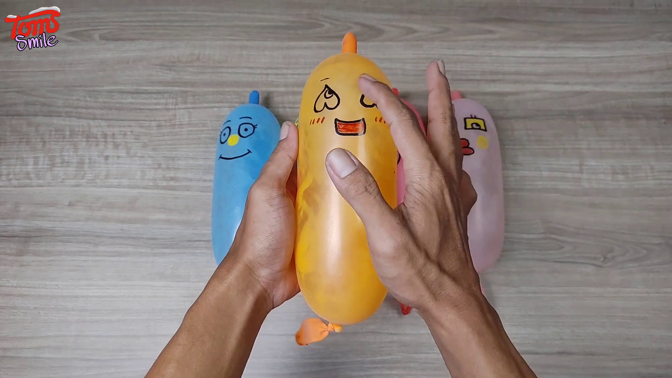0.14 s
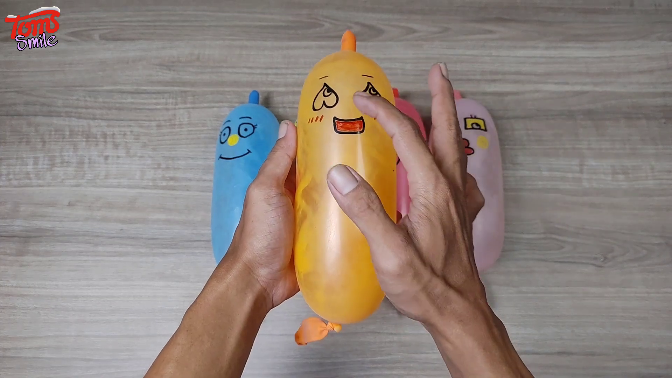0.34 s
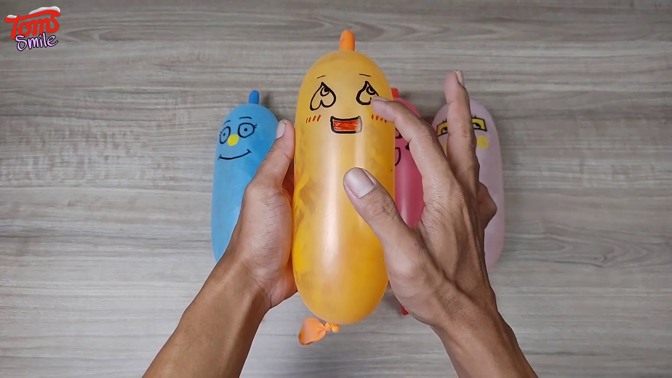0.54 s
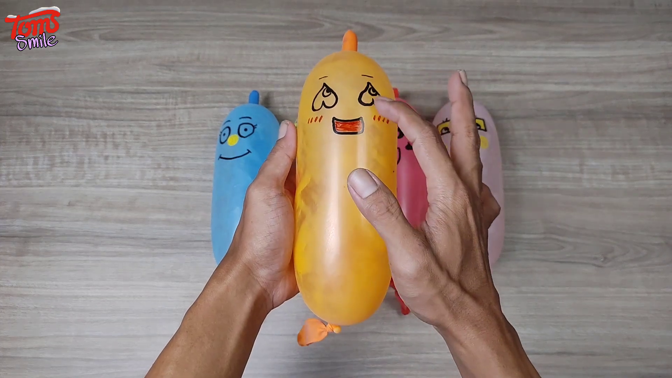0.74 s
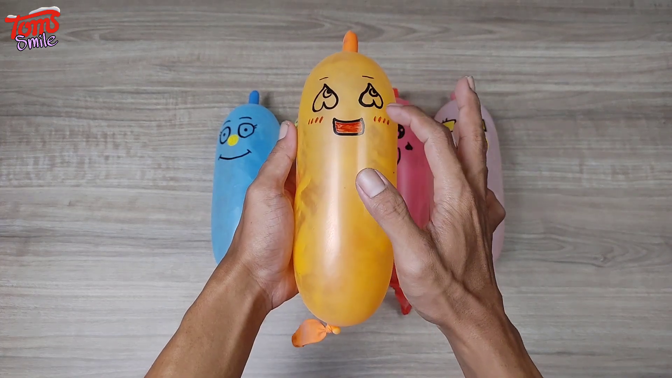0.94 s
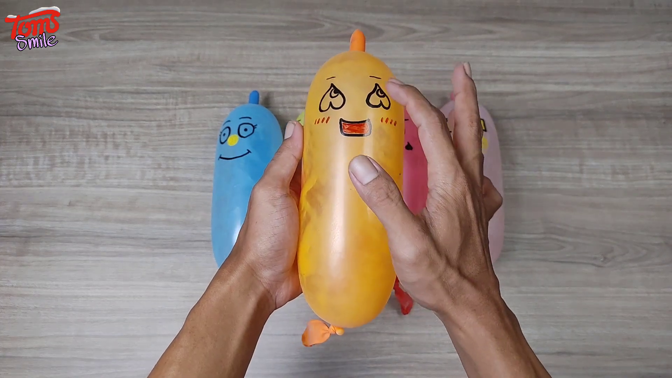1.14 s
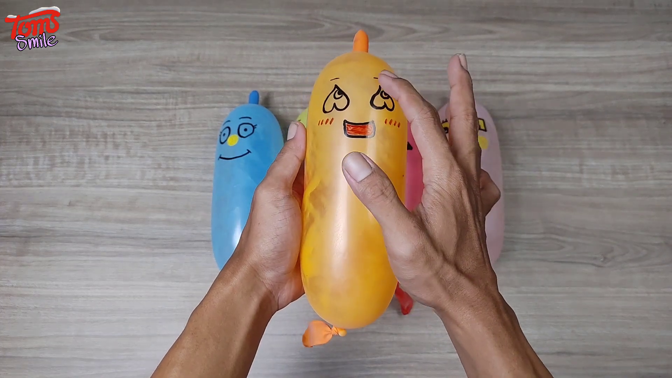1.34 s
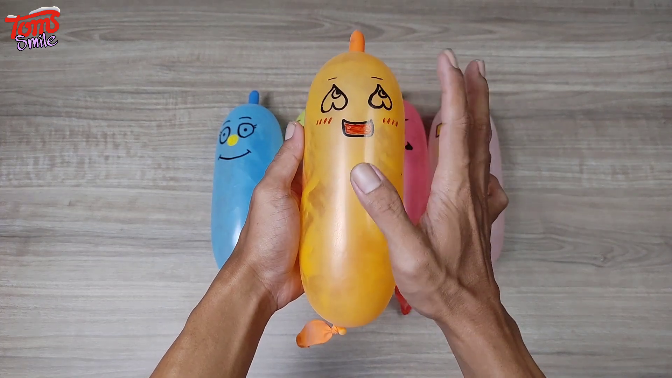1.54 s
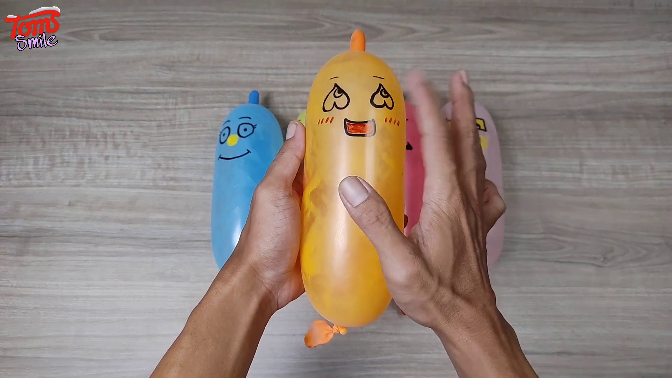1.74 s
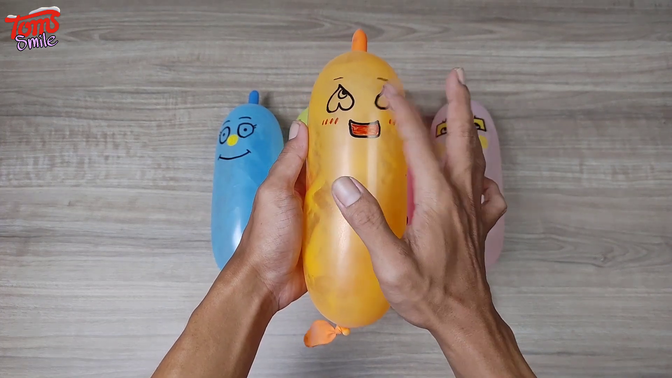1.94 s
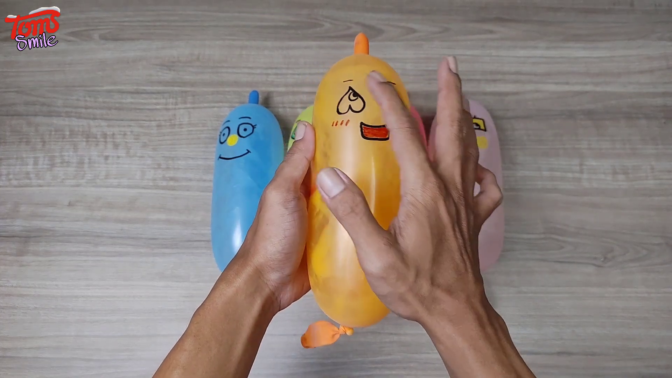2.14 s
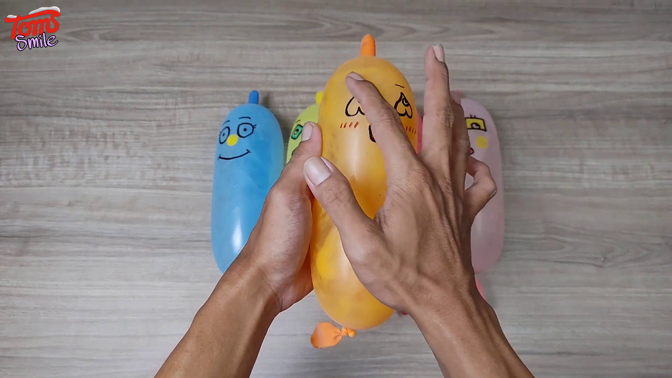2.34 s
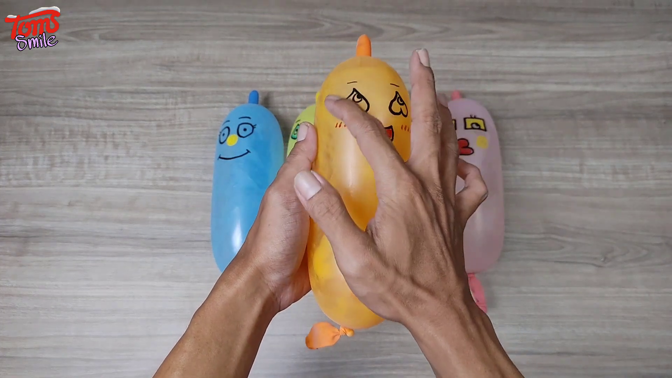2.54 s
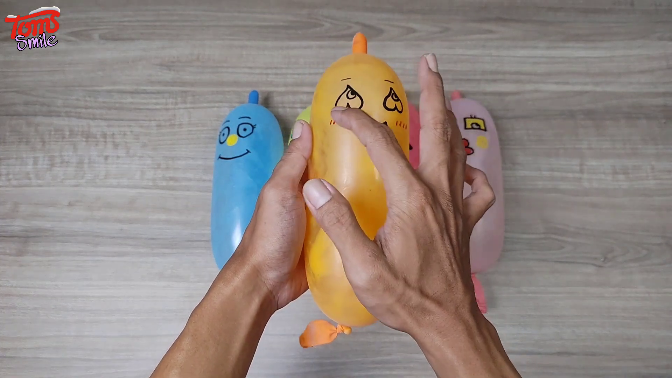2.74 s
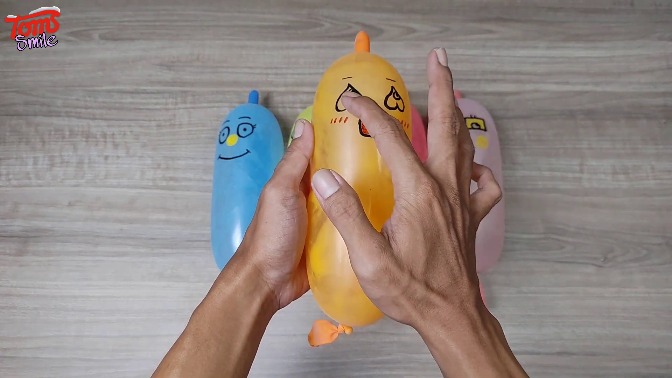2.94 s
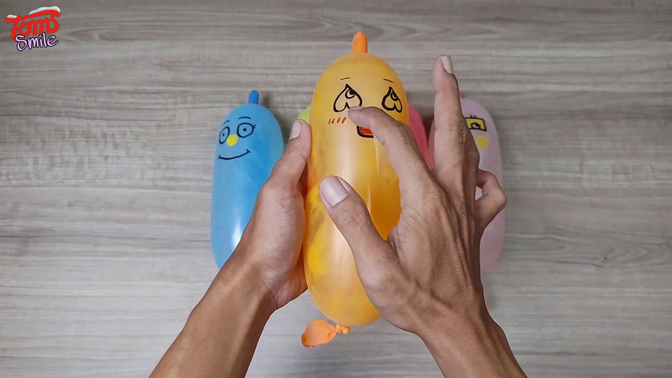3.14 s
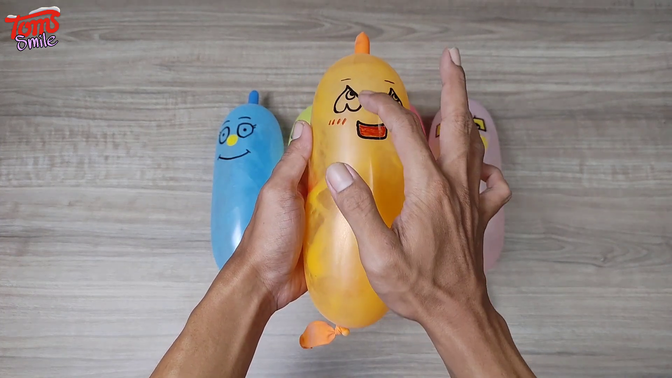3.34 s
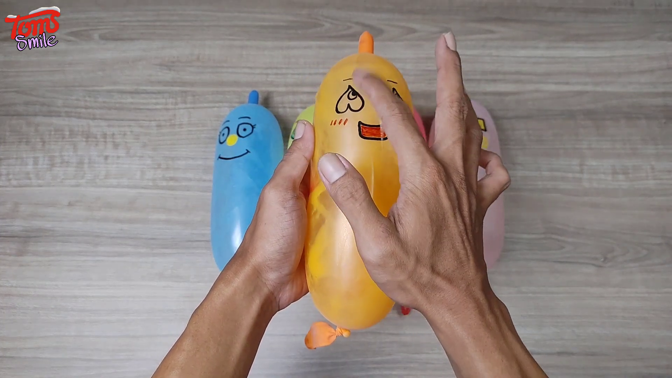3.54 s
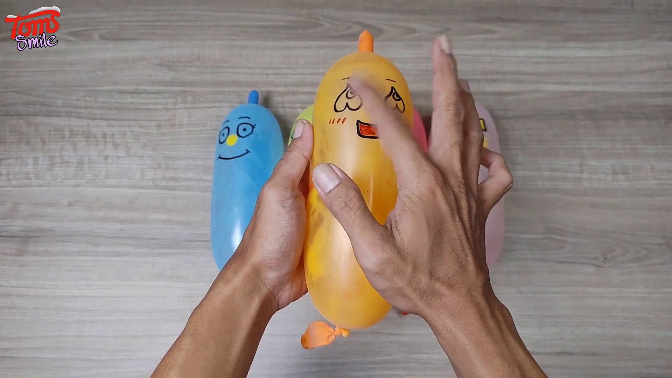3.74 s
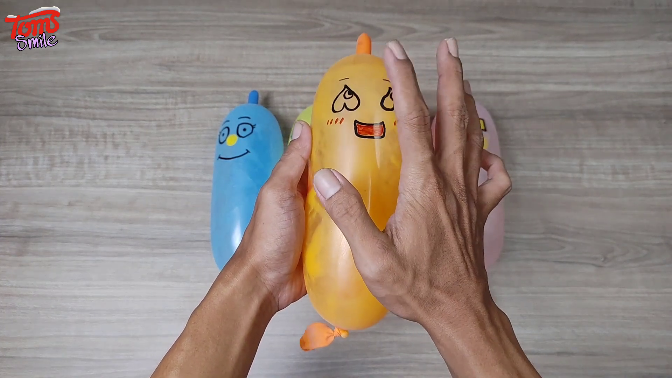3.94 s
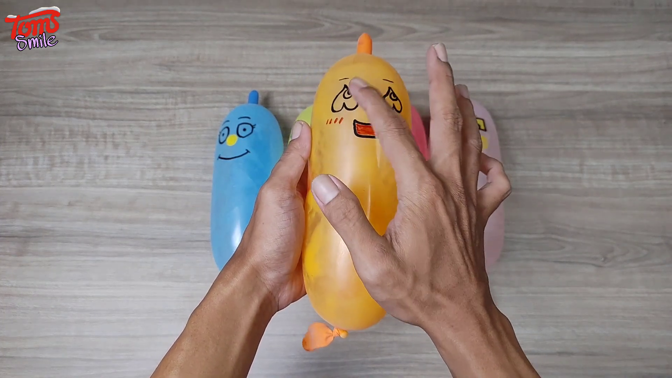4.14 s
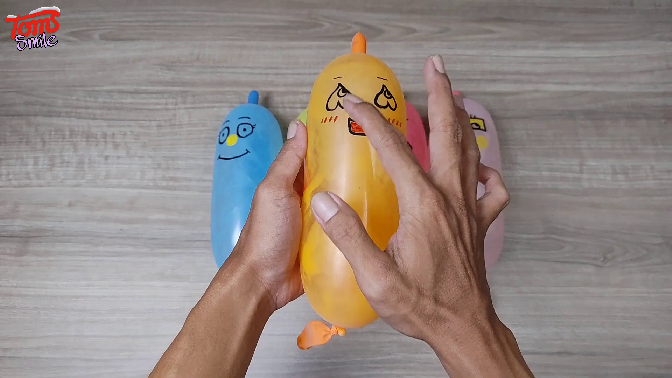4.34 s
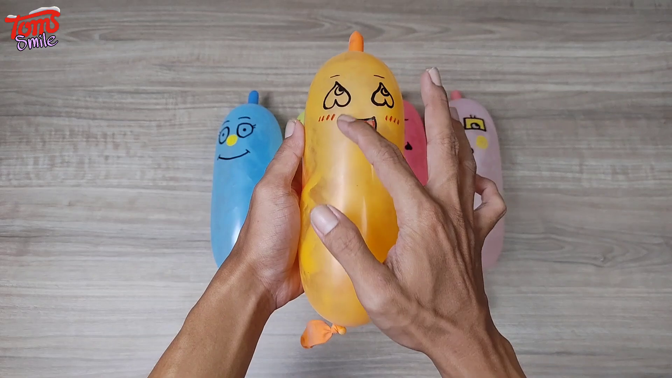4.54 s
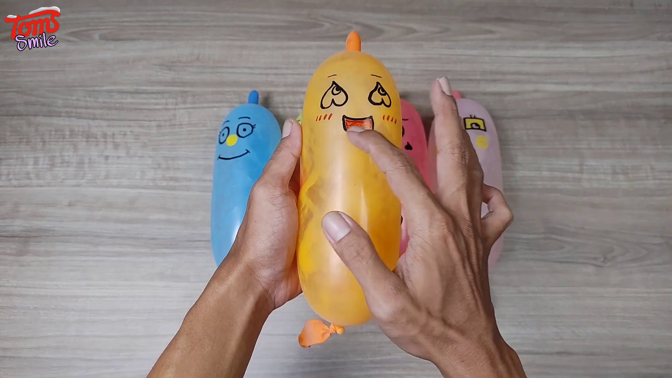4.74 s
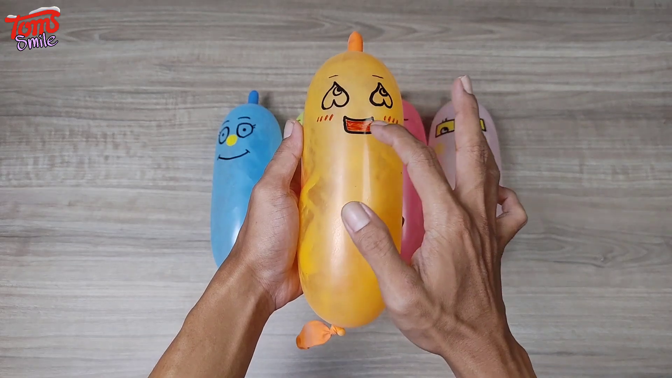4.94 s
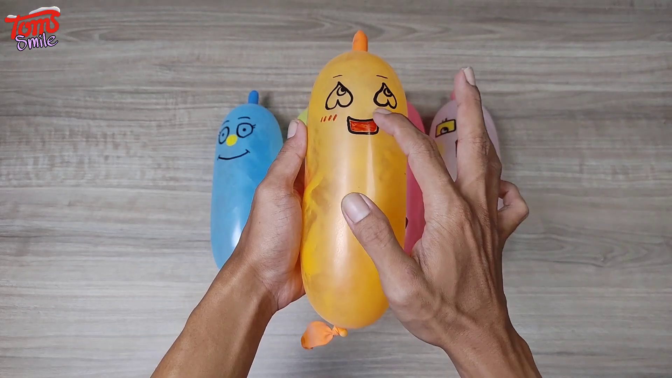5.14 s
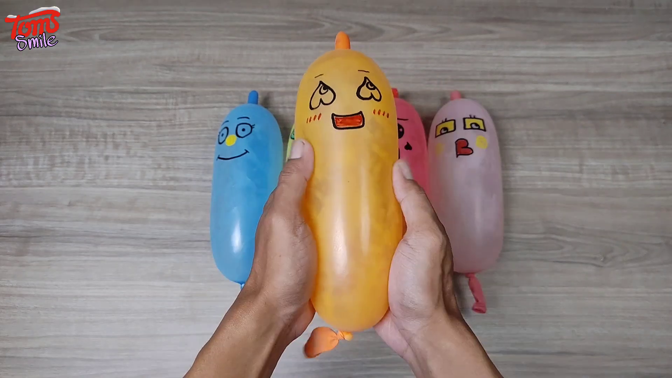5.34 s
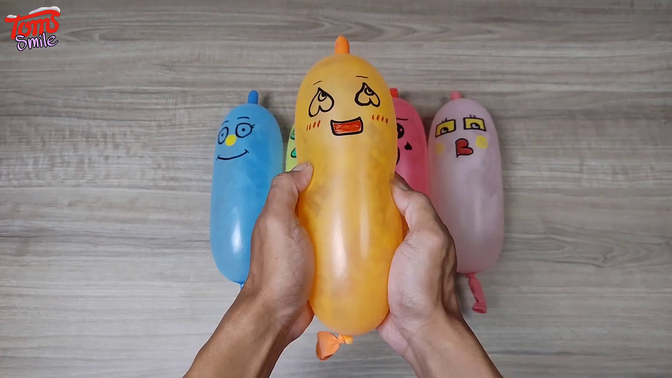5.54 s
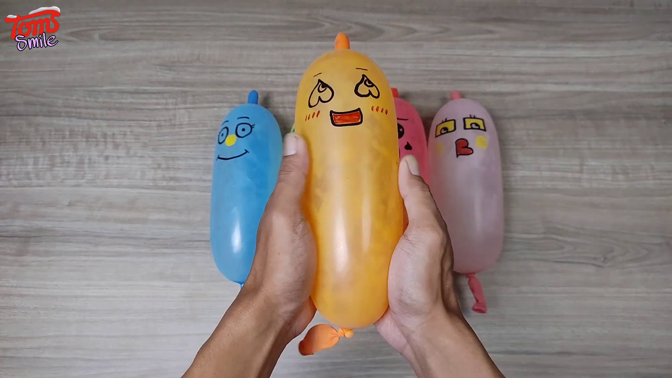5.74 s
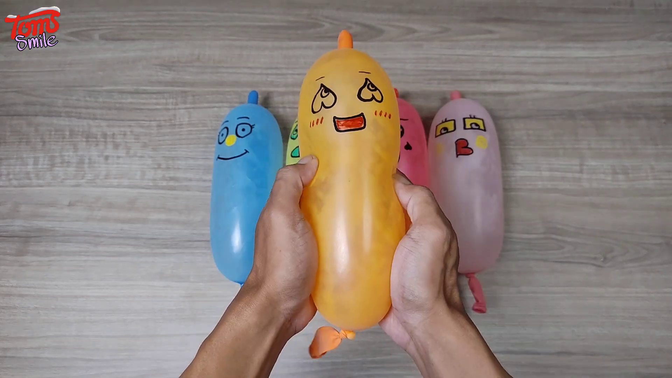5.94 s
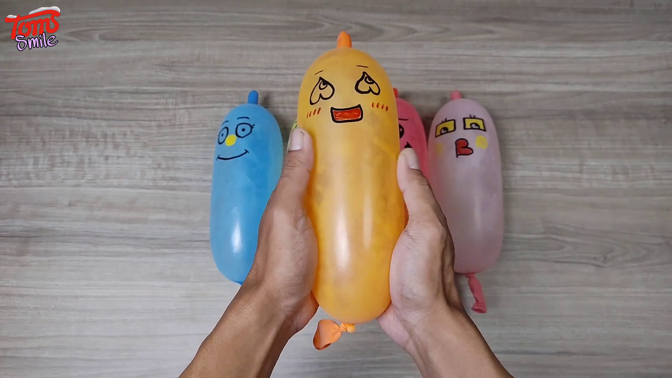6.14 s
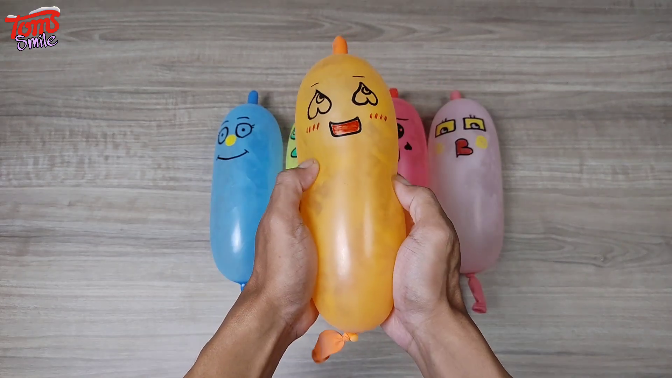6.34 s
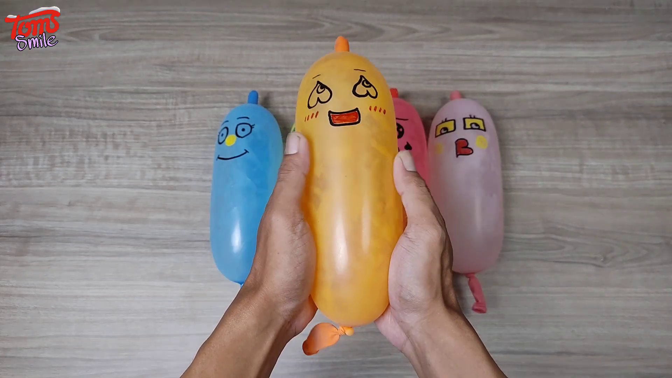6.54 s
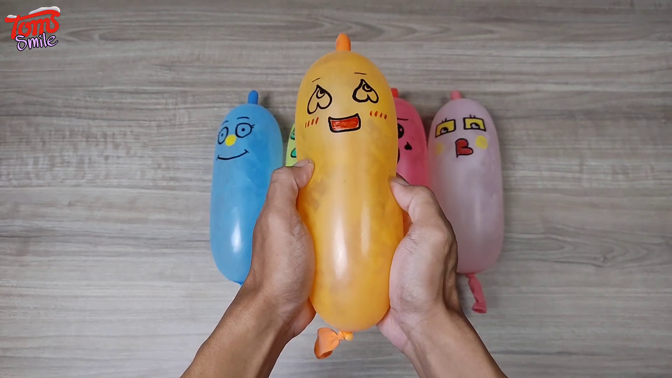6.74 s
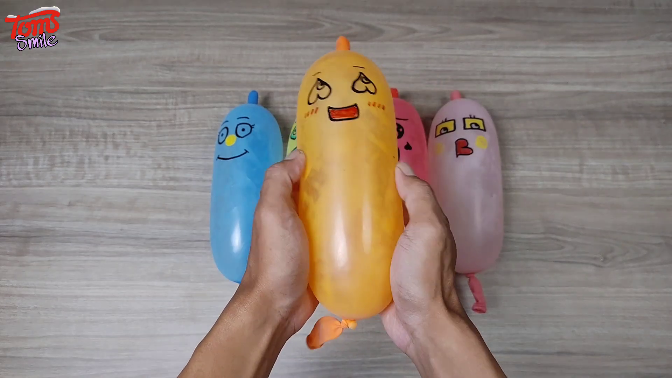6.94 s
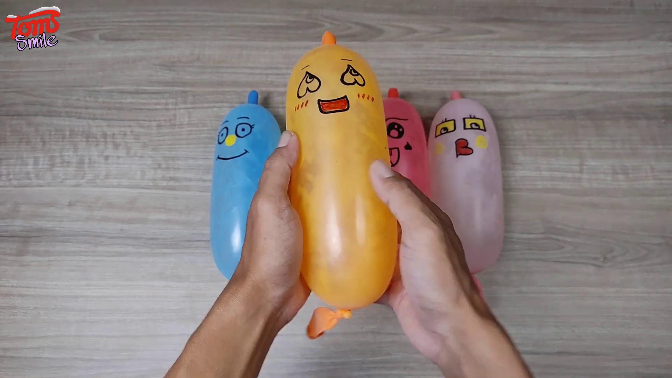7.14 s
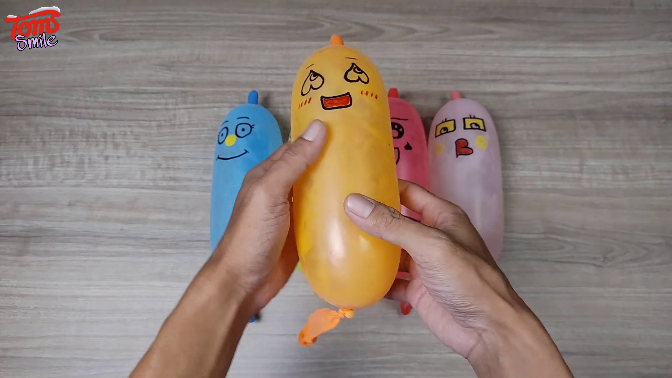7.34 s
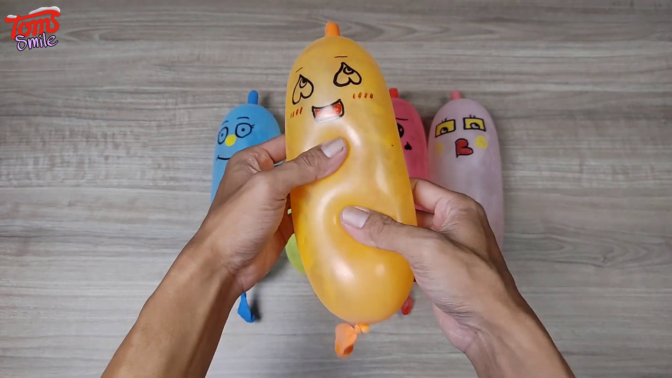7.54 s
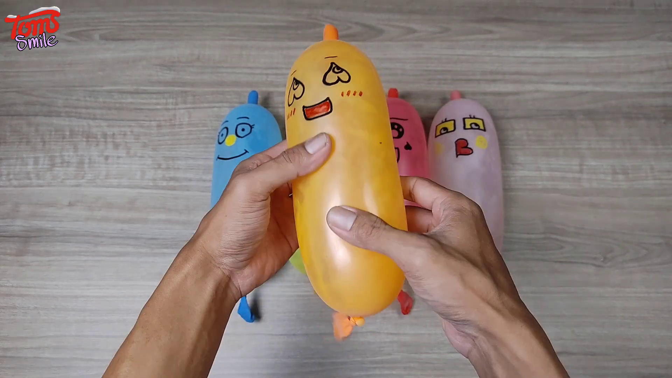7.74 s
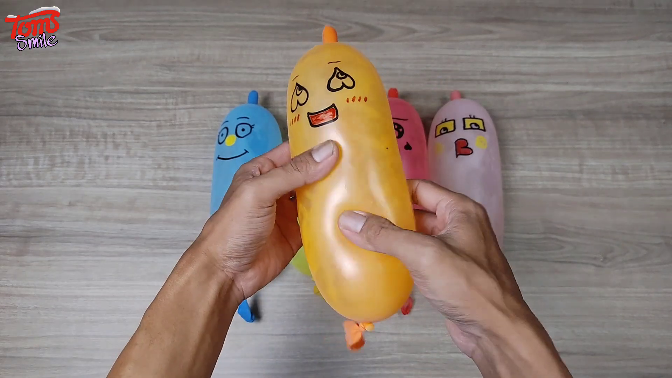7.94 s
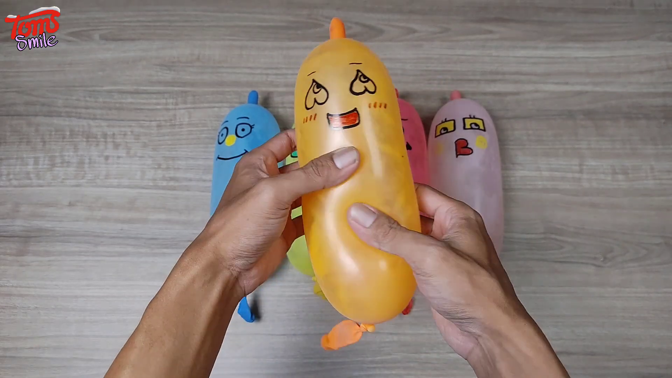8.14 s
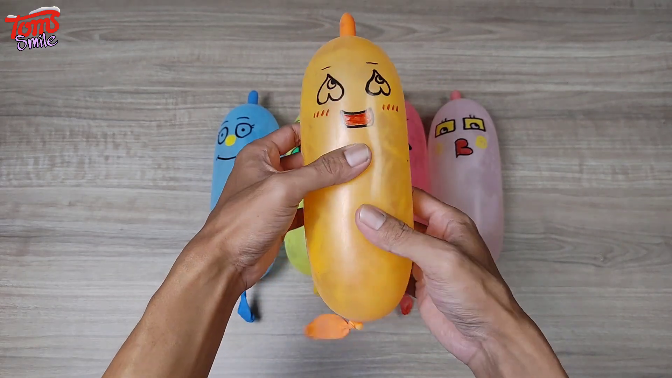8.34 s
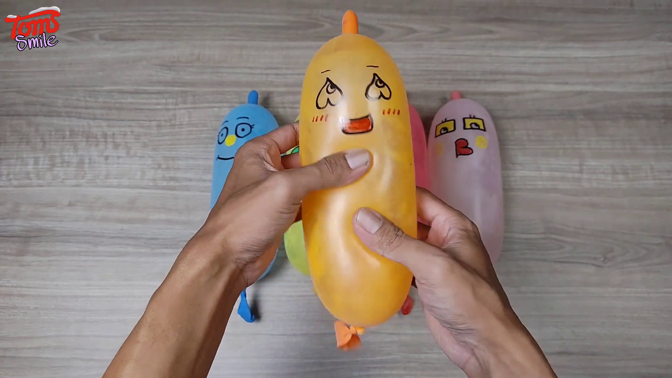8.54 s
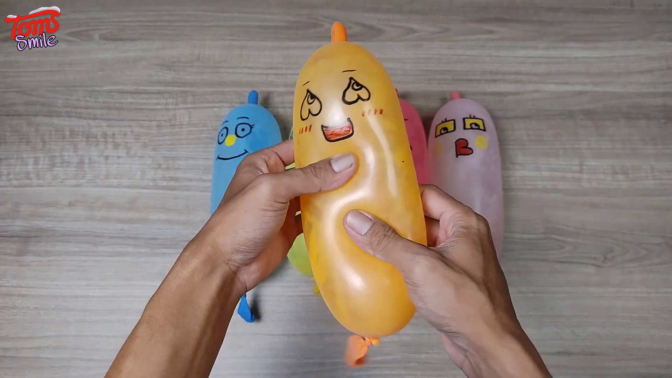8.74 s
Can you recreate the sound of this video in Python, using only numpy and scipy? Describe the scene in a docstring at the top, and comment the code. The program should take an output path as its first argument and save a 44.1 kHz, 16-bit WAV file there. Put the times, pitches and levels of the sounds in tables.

```python
"""Fingertips pluck a long, air-filled rubber balloon in a small, quiet room, over a low rush and faint insects.
Then two palms drag on it five times: the rubber sticks and slips in a low creaking squeak.
Each release is a snap and a crackle that ring a bank of damped resonances; gliding tones add the squeals.
Dry skin hisses, as swelling noise, when the hands slide back; light rubs and a few faint taps follow."""
import sys
import numpy as np
from scipy import signal
from scipy.fft import rfft, irfft
from scipy.io import wavfile
from scipy.ndimage import uniform_filter1d

SR = 44100
rng = np.random.default_rng(int(sys.argv[2]) if len(sys.argv) > 2 else 0)


def wav_record(signal):
    """Record a signal, one row per channel, as 16-bit PCM in the file named by sys.argv[1]."""
    frames = np.transpose(np.atleast_2d(signal))
    bounded = np.clip(frames, -1, 1)
    # unit amplitude maps onto the largest positive 16-bit level
    quanta = np.round(bounded * 32767).astype(np.int16)
    wavfile.write(sys.argv[1], SR, quanta)


N = 391166
TIME = np.arange(N) / SR

# Fingertips catching the rubber. Each row: start in seconds, relative level in dB, treble relative to
# that level in dB, pitch of the snap in Hz, drop to each further catch in dB (a negative drop is a rise).
FINGER_TAPS = [(0.017, -52.5, -8.5, 858, 4), (0.029, -49, -17, 580, 8), (1.852, -38.5, -14.5, 621, 7.5),
               (2.078, -57, -15, 693, 16), (2.142, -42, -12.5, 583, 8), (3.946, -43, -14, 667, 4.5),
               (4.241, -44, -16, 621, 4), (7.360, -59, -26, 614, 7), (7.874, -62, -23, 564, -2),
               (8.146, -66, -12, 530, 0.5), (8.230, -61, -13, 627, 3), (8.295, -54.5, -13.5, 686, 6),
               (8.421, -61.5, -12, 693, 4)]

# largest random departure of one slip from the next: level in dB, pitch in octaves
LEVEL_SCATTER_DB, PITCH_SCATTER_OCTAVES = 4, 0.26


def undb(db):
    """Level and amplitude: 20 dB is a factor of ten in pressure."""
    return 10 ** (np.asarray(db) / 20)


def level(x, db):
    """Effective value: scale a signal to a given rms level."""
    return x * undb(db) / np.sqrt(np.mean(x ** 2))


def along(points, hz):
    """Logarithmic pitch: read (Hz, value) points on a log-frequency axis."""
    f, value = np.transpose(points)
    return np.interp(np.log(np.maximum(hz, 1)), np.log(f), value)


def convolve(x, response):
    """Linear superposition: every sample launches one scaled impulse response."""
    return signal.fftconvolve(x, response)[:N]


def lowpass(x, hz, order=2):
    """Low-pass filtering: a Butterworth response rounds off the treble."""
    return signal.sosfilt(signal.butter(order, hz, fs=SR, output="sos"), x)


def noise(points):
    """Spectral shaping: white noise weighted by a spectrum in dB, rms 1."""
    size = 2 ** 19
    colour = undb(along(points, np.fft.rfftfreq(size, 1 / SR)))
    white = rfft(rng.standard_normal(size))
    return level(irfft(white * colour)[:N], 0)


def band(hz, width, size):
    """Band-pass filtering: white noise confined to a band, rms 1."""
    sos = signal.butter(2, [hz - width / 2, hz + width / 2], "band", fs=SR, output="sos")
    return level(signal.sosfilt(sos, rng.standard_normal(size)), 0)


def pulse(points, size=2048):
    """Minimum phase: the folded cepstrum packs a spectrum into the most compact causal pulse, peak 1."""
    cepstrum = irfft(np.log(undb(along(points, np.fft.rfftfreq(size, 1 / SR)))))
    cepstrum[1:size // 2] *= 2
    cepstrum[size // 2 + 1:] = 0
    shape = irfft(np.exp(rfft(cepstrum)))
    return shape / np.abs(shape).max()


def kicks(times, sizes):
    """Impulsive excitation: one impulse for each event."""
    return np.bincount(np.clip(times * SR, 0, N - 1).astype(int), sizes, N)


def fading(x, t60):
    """Exponential decay: each impulse falls by 60 dB in t60 seconds."""
    decay = np.exp(-np.log(1000) / (t60 * SR))
    return signal.lfilter([1], [1, -decay], x + 1e-18)


def swell(t, length):
    """Gaussian envelope: a smooth rise and fall around t = 0."""
    return np.exp(-2 * (t / length) ** 2)


def background(air_db=-67, hum_hz=105):
    """Broadband and narrow-band noise: a low rush of air with a wavering hum."""
    # Steady rush. Each row: frequency in Hz, relative level in dB.
    air_colour = [(20, -14), (40, -12.5), (62, -9.5), (85, -20), (110, -4), (160, 0.5), (270, -1),
                  (480, -11.5), (1000, -21.5), (2700, -26), (4000, -28.5), (5800, -36), (8500, -36.5),
                  (13000, -30.5)]
    # Hum that comes and goes. Each row: time in seconds, level in dB.
    hum_levels = [(0, -76.5), (4, -78), (6.5, -73.5), (7.1, -69), (8.85, -71.5)]
    rush = undb(air_db) * noise(air_colour)
    hum = undb(np.interp(TIME, *np.transpose(hum_levels))) * band(hum_hz, 4.55, N)
    return rush + hum


def insects():
    """Amplitude modulation of narrow bands: steady trills, evenly spaced chirps and a slow thin note."""
    # Steady trills. Each row: frequency in Hz, bandwidth in Hz, level in dB.
    trill_bands = [(2942, 120, -87), (7004, 550, -86.5), (11360, 700, -92)]
    # Bouts of chirping. Each row: first chirp in seconds, last chirp in seconds, level in dB.
    chirp_bouts = [(0.417, 0.644, -84), (1.963, 2.185, -83), (2.69, 3.484, -83), (3.944, 4.394, -83.5),
                   (5.525, 8.8, -83.5)]
    chirp_gap_s, chirp_s, chirp_hz, chirp_width_hz = .25, .15, 4680, 540  # the gap is approximate
    # a second insect repeats a long, thin note
    note_first_s, note_gap_s, note_s = 1.175, 1.985, 0.2
    note_hz, note_width_hz, note_db = 2548, 29, -85

    trills = sum(undb(db) * band(hz, width, N) for hz, width, db in trill_bands)
    chirps = np.zeros(N)
    for first, last, db in chirp_bouts:
        for s in np.linspace(first, last, round((last - first) / chirp_gap_s) + 1):
            chirps += undb(db) * swell(TIME - s, chirp_s)
    notes = sum(undb(note_db) * swell(TIME - note_first_s - k * note_gap_s, note_s) for k in range(3))
    chirping = chirps * band(chirp_hz, chirp_width_hz, N)
    return trills + chirping + notes * band(note_hz, note_width_hz, N)


def room(x, wet_db=-9.5, gap_s=0.003, build_s=0.032):
    """Diffuse reverberation: octave bands of noise decay at their own rates, the middle range slowest."""
    # Decay of the room. Each row: frequency in Hz, time to fall by 60 dB in seconds.
    room_decay = [(150, .35), (400, .4), (800, .48), (1600, .38), (3700, .33), (12000, .22)]
    t = np.arange(SR) / SR
    hz, white, tail = np.fft.rfftfreq(SR, 1 / SR), rfft(rng.standard_normal(SR)), 0
    for centre in 125 * 2 ** np.arange(8):
        share = np.clip(1 - np.abs(np.log2(np.maximum(hz, 1) / centre)), 0, 1)
        decay = np.exp(-np.log(1000) * t / along(room_decay, centre))
        tail = tail + irfft(white * share, SR) * decay
    # reflections start after a gap, then build up
    tail = tail * np.clip((t - gap_s) / build_s, 0, 1)
    return x + undb(wet_db) * convolve(x, tail / np.sqrt(np.sum(tail ** 2)))


def sliding(grain_db=2.0):
    """Kinetic friction: without pressure the skin does not stick, it only hisses, a little grainy."""
    # Dry skin sliding back. Each row: middle in seconds, length in seconds, level in dB.
    slide_strokes = [(5.461, 0.043, -63.5), (5.913, 0.055, -62), (6.314, 0.042, -63.5),
                     (6.707, 0.037, -61.5), (7.176, 0.16, -67.5), (7.37, 0.11, -71.5), (7.53, 0.13, -74.5)]
    # Colour of the hiss. Each row: frequency in Hz, relative level in dB.
    hiss_colour = [(1000, 6), (3000, 4), (5000, 0.5), (8000, -1.5), (11000, 3.5), (15500, -3.5)]
    brush_lag_s, brush_s, brush_db = .02, 0.028, -30.5  # level relative to the tap
    # a fingertip brushes off after each tap
    brushes = [(s + brush_lag_s, brush_s, db + brush_db) for s, db, *_ in FINGER_TAPS]
    power = sum((undb(db) * swell(TIME - s, length)) ** 2
                for s, length, db in [*slide_strokes, *brushes])
    grain = level(uniform_filter1d(rng.standard_normal(N), size=120), 0)
    return np.sqrt(power) * noise(hiss_colour) * undb(grain_db * grain)


def balloon(events, push_db, return_db, return_s, crack_db, crack_t60, body_db, skin_db, ring, focus_db,
            opposed=True):
    """Modal synthesis: each release of the rubber snaps, crackles for an instant and rings the modes."""
    # Air column and rubber skin. Each row: frequency in Hz, relative level in dB,
    # time to fall by 60 dB in seconds (for the air modes, before ring scales it).
    body_modes = [(256, -14, .2), (307, -3, .27), (384, 3, .19), (422, -8, .14), (513, -5, .18),
                  (549, -2, .16), (598, -9, .11), (667, -3.5, .29), (755, -11, .22), (831, -9, .22),
                  (883, -9, .22), (968, -9, .17), (1034, -8, .17), (1140, -9, .12), (1240, -9, .1),
                  (1322, -11, .15), (1437, -19, .15), (2060, -12, .05), (2270, -9, .04), (2463, -10, .05),
                  (3030, 1.5, .08), (3780, -14, .06), (4180, -17, .04), (5430, -20, .06), (6670, -24, .05),
                  (7330, -24, .05)]
    # Push of one snap on the air, at its reference pitch. Each row: frequency in Hz, relative level in dB.
    push_colour = [(40, -32), (120, -29), (200, -11), (350, 1.5), (600, 8), (800, -1), (1250, -5.5),
                   (1700, -24), (3000, -26.5)]
    # Crack of one snap. Each row: frequency in Hz, relative level in dB.
    crack_colour = [(600, -2), (1650, 2.5), (2300, 6), (3300, -7), (4000, -4), (5500, -14), (7500, -12.5),
                    (9000, -20), (15000, -25)]
    push_hz, skin_hz = 585, 1800  # reference pitch of the push; the skin modes start at skin_hz

    times, db, treble_db, pitch = np.transpose(events)
    low, high = undb(db), undb(db + treble_db)
    shape, n, snaps = pulse(push_colour), np.arange(2048), np.zeros(N + SR)
    for s, size, hz, chance in zip(times, low, pitch, rng.random((len(times), 2))):
        # a tighter contact snaps faster
        speed = hz / push_hz
        # the wave comes back round the skin, slower and lower
        return_lag = return_s * (.5 + chance[0])
        return_speed = speed / (1 + chance[1] / 2)
        for lag, gain, rate in (0, 1, speed), (return_lag, undb(return_db), return_speed):
            first = int((s + lag) * SR)
            snaps[first:first + len(n)] += size * gain * np.interp(n * rate, n, shape, right=0)
    out = undb(push_db) * lowpass(snaps[:N], 1450, order=5)
    out += undb(crack_db) * fading(kicks(times, high), crack_t60) * noise(crack_colour)

    for k, (hz, mode_db, t60) in enumerate(body_modes):
        if hz < skin_hz:
            # air modes near the pitch of the snap ring most: focus_db less per octave away
            sizes = low * undb(body_db - focus_db * np.abs(np.log2(hz / pitch)))
            mode_t60 = ring * t60
        else:
            # the crack rings the skin modes
            sizes = high * undb(skin_db)
            mode_t60 = t60
        drive = lowpass(kicks(times, sizes) + 1e-18, 2 * hz)
        radius, turn = np.exp(-np.log(1000) / (mode_t60 * SR)), 2 * np.pi * hz / SR
        numerator = [0, radius * np.sin(turn)]
        denominator = [1, -2 * radius * np.cos(turn), radius ** 2]
        # under a broad contact neighbouring modes swing in opposite senses,
        # so the ring builds up after the snap
        sense = (-1) ** k if opposed else 1
        out += sense * undb(mode_db) * signal.lfilter(numerator, denominator, drive)
    return out


def catches(count=4):
    """Repeated stick-slip: a tap is a short run of catches, mostly ever weaker; rows as for the slips."""
    catch_gap_s = .0095  # mean spacing
    rows = []
    for s, db, treble_db, hz, drop_db in FINGER_TAPS:
        for k, late in enumerate(rng.uniform(-.2, 0.22, count)):
            rows.append((s + catch_gap_s * k * (1 + late), db - k * drop_db, treble_db, hz))
    return np.array(rows)


def knocks(knock_db=-4.0, knock_s=0.023):
    """Damped local resonance: the skin under a fingertip bounces until the finger settles and stops it."""
    out, t = np.zeros(N), TIME[:SR // 5]
    for s, db, _, hz, _ in FINGER_TAPS:
        first = int(s * SR)
        bounce = np.exp(-(t / knock_s) ** 2) * np.sin(2 * np.pi * hz * t)
        out[first:first + len(t)] += undb(db + knock_db) * bounce
    return out


def fingertips(low_hz=450, slap_db=2, slap_t60=0.029, slap_hz=1400, slap_width_hz=1200):
    """Point excitation: a small contact starts all modes together; the resting hands damp the ring."""
    events = catches()
    plucks = balloon(events, push_db=-8, return_db=-22, return_s=.0028, crack_db=-25, crack_t60=0.032,
                     body_db=-4, skin_db=-2.5, ring=0.46, focus_db=16, opposed=False)
    times, db, treble_db, _ = events.T
    slap_envelope = fading(kicks(times, undb(db + treble_db)), slap_t60)
    slap = undb(slap_db) * slap_envelope * band(slap_hz, slap_width_hz, N)
    highpass = signal.butter(2, low_hz, "high", fs=SR, output="sos")
    return signal.sosfilt(highpass, plucks + knocks()) + slap


def slips(count=26):
    """Stick-slip friction: for each stroke, rows of (s, level dB, treble relative to it dB, pitch Hz)."""
    # Palm strokes. Each row: start in seconds, rise in seconds, hold in seconds, release in dB per second,
    # relative level in dB, treble relative to that level in dB, pitch of the snap at the end of the rise in Hz.
    palm_strokes = [(5.343, 0, 0.021, 396, -32.5, -27, 614), (5.568, 0.13, 0.063, 155, -28.5, -26, 534),
                    (6.006, .11, 0.036, 146, -29, -24.5, 525), (6.428, 0.037, 0.1, 187, -27, -27, 635),
                    (6.81, 0.064, .09, 232, -27.5, -22.5, 638)]
    # the grip tightens from touch_db relative to full strength;
    # the slips come quickly at first and settle to a slower creak
    touch_db, first_gap_s, full_gap_s, settle_s = -14.5, .0102, .0162, .115
    # as the contact spreads, the snaps sink in pitch and grow scratchier
    sag_octaves_per_s, scratch_db_per_s = 1.4, 59.5
    gap_scatter, treble_scatter_db = .25, 4.5  # gap_scatter: share of the settled gap

    rows = []
    for start, rise, hold, release, db, treble_db, hz in palm_strokes:
        age = 0
        for late, strong, bright, tight in rng.uniform(-1, 1, (count, 4)):
            grip_db = touch_db * (1 - age / rise) ** 2 if age < rise else 0
            grip_db -= release * max(age - rise - hold, 0)
            spread = np.clip(age - rise, -rise, hold)  # seconds from the end of the rise
            slip_db = db + grip_db + LEVEL_SCATTER_DB * strong
            # the level scatter is taken out of the treble again
            slip_treble_db = (treble_db + scratch_db_per_s * spread
                              + treble_scatter_db * bright - LEVEL_SCATTER_DB * strong)
            slip_hz = hz * 2 ** (PITCH_SCATTER_OCTAVES * tight - sag_octaves_per_s * spread)
            rows.append((start + age, slip_db, slip_treble_db, slip_hz))
            settled = min(age / settle_s, 1) ** 2
            gap = first_gap_s + (full_gap_s - first_gap_s) * settled
            age += gap * (1 + gap_scatter * settled * late)
    return np.reshape(rows, (len(palm_strokes), count, -1))


def grains(count=16):
    """Micro-slip: a light rub, as the hands shift their hold, is a swarm of tiny slips; rows as for slips."""
    # Light rubs. Each row: middle in seconds, half-length in seconds, relative level of a middle grain in dB.
    light_rubs = [(7.21, .2, -55.5), (7.365, .015, -62.5), (7.42, .25, -66), (7.879, .03, -60.5),
                  (7.933, .04, -70), (8.171, .06, -63), (8.361, .04, -63)]
    rub_treble_db, rub_hz = -23, 570
    rows = []
    for s, half_length, db in light_rubs:
        for k, (late, strong, tight) in enumerate(rng.uniform(-1, 1, (count, 3))):
            place = (2 * k + late) / count - 1  # about -1 to 1 across the rub
            grain_db = db + 20 * np.log10(swell(place, 0.91)) + LEVEL_SCATTER_DB * strong
            grain_hz = rub_hz * 2 ** (PITCH_SCATTER_OCTAVES * tight)
            rows.append((s + place * half_length, grain_db, rub_treble_db, grain_hz))
    return np.array(rows)


def whistles(events):
    """Tension resonance: a brief whistle after each slip while the skin is taut; rows as for the squeals."""
    # Whistles of the taut skin. Each row: frequency in Hz, length in seconds, level in dB,
    # the last before scatter and tautness.
    whistle_tones = [(2376, 0.0049, -45), (3055, .013, -56), (5420, .011, -60.5)]
    taut_at_s, taut_s = 6.935, 0.071  # middle and length of the taut stretch
    scatter_db, detune_share, glide_hz_per_s = 4.5, 0.027, -3000
    rows = []
    for hz, length, db in whistle_tones:
        for s, (detune, strong) in zip(events[:, 0], rng.uniform(-0.95, 1, (len(events), 2))):
            taut_db = 20 * np.log10(swell(s - taut_at_s, taut_s) + 1e-9)
            rows.append((s + length / 2, length, hz * (1 + detune_share * detune), glide_hz_per_s,
                         db + scatter_db * strong + taut_db))
    return rows


def squeals(events):
    """Self-sustained oscillation: single resonances swell, glide and flutter under light friction."""
    out = np.zeros(N)
    for s, length, hz, glide, db in events:
        first = int(s * SR) - SR // 4
        t = TIME[first:first + SR // 2] - s
        smoothed = uniform_filter1d(rng.standard_normal(len(t)), size=300)
        flutter = level(uniform_filter1d(smoothed, size=300), 0)
        phase = 2 * np.pi * (hz * t + glide * t ** 2 / 2) + 0.21 * flutter
        out[first:first + len(t)] += undb(db + 2 * flutter) * swell(t, length) * np.sin(phase)
    return out


def palms():
    """Distributed excitation: broad, slow slips move the whole air column; light rubs come after them."""
    # Light friction keeps one resonance singing. Each row: middle in seconds, length in seconds,
    # frequency at the middle in Hz, glide in Hz per second, level in dB before flutter.
    squeal_tones = [(5.47, 0.072, 316, -58, -45.5), (5.72, 0.038, 340, -500, -60),
                    (5.83, 0.058, 663, -100, -43), (6.11, 0.05, 378, -300, -33),
                    (6.225, 0.042, 665, 4, -38), (6.585, 0.038, 650, -300, -53),
                    (6.93, 0.055, 382, -400, -40), (7.015, 0.032, 661.5, -200, -35.5),
                    (7.1, 0.036, 673, 0, -44.5)]
    strokes = slips()
    creak = balloon(np.vstack([*strokes, grains()]), push_db=6.0, return_db=-6.5, return_s=0.002324,
                    crack_db=-1.0, crack_t60=0.046, body_db=-12, skin_db=-6.5, ring=0.87, focus_db=8.0)
    # the skin whistles in the last stroke only
    return creak + squeals([*squeal_tones, *whistles(strokes[-1])])


def scene():
    """Superposition: balloon in its room over the background; small taps stir the room less than strokes."""
    hands = room(palms() + sliding())
    taps = room(fingertips(), wet_db=-11.5, gap_s=0.0045, build_s=0.015)
    return (hands + taps + insects() + background())[None]


def record(dry):
    """Band limiting: the recorder cuts the top with a steep elliptic low-pass."""
    top_hz = 15550
    return signal.sosfilt(signal.ellip(10, .2, 70, top_hz, fs=SR, output="sos"), dry)


dry = scene()
out = record(dry)
wav_record(out)
```